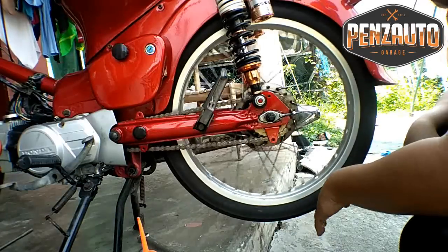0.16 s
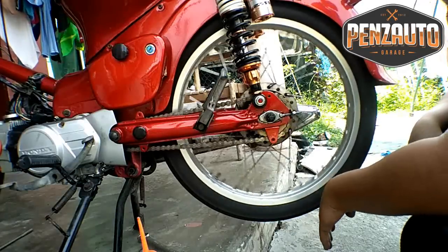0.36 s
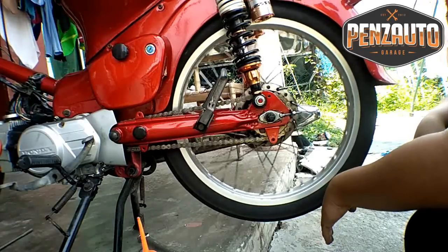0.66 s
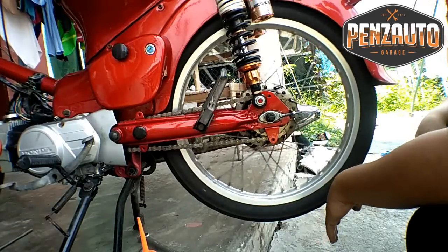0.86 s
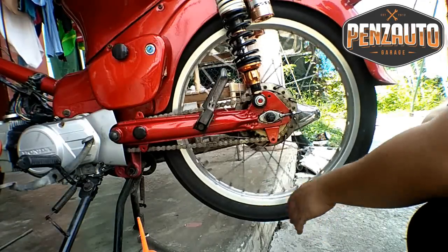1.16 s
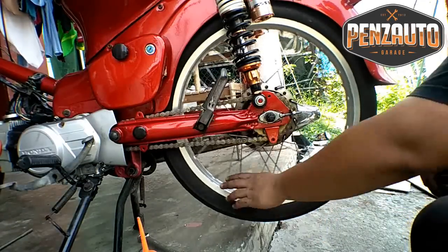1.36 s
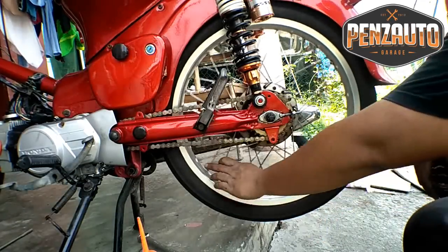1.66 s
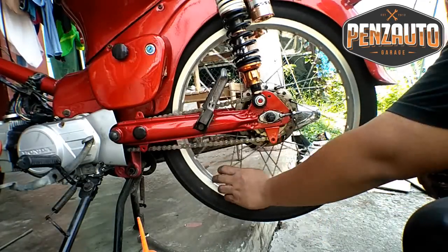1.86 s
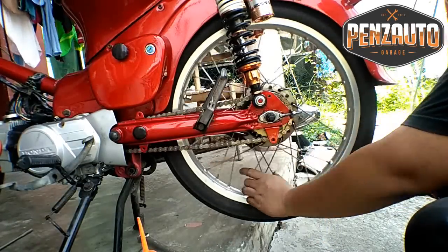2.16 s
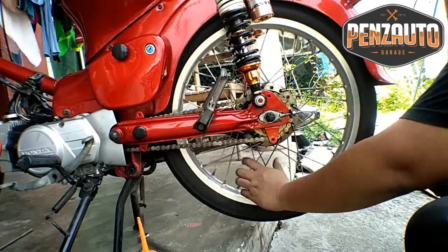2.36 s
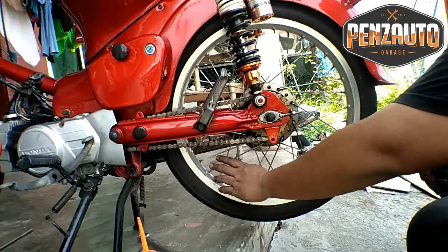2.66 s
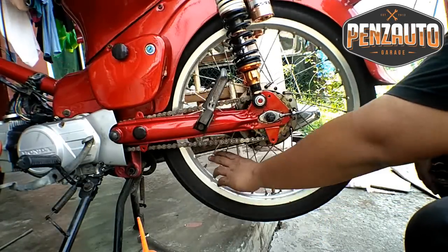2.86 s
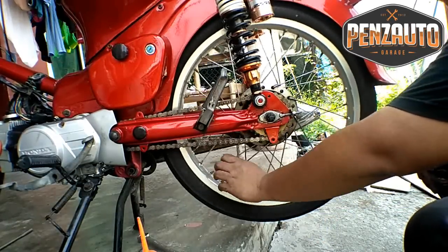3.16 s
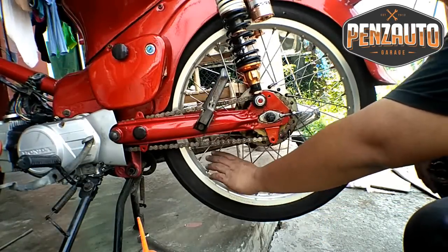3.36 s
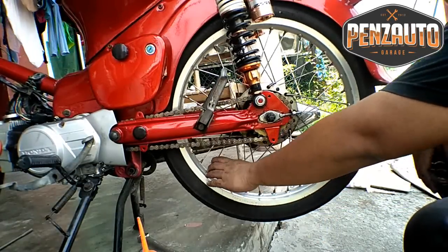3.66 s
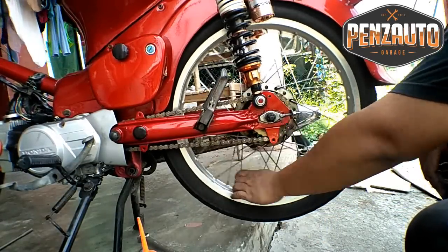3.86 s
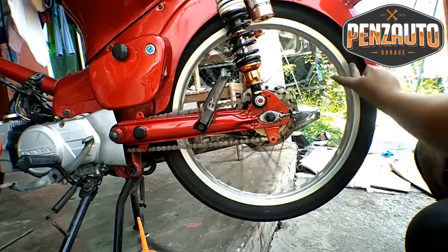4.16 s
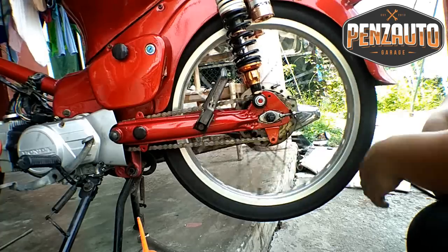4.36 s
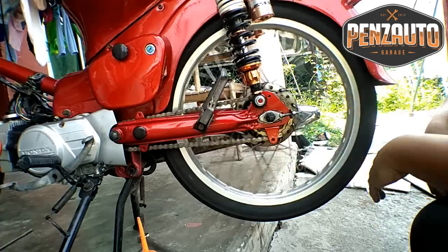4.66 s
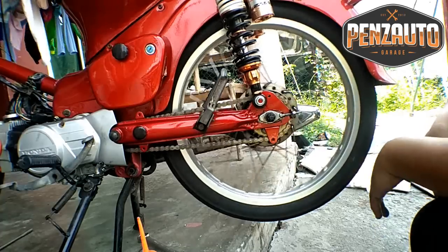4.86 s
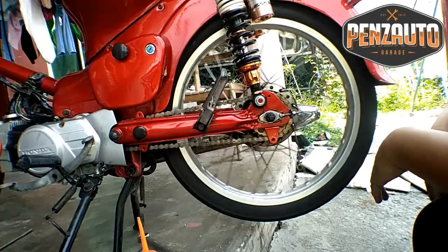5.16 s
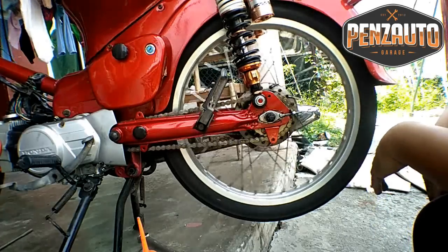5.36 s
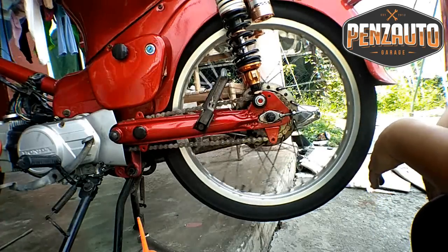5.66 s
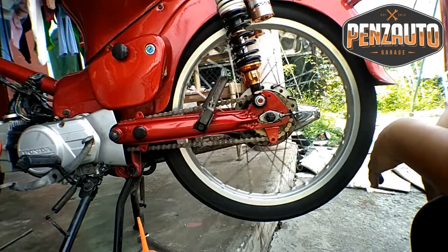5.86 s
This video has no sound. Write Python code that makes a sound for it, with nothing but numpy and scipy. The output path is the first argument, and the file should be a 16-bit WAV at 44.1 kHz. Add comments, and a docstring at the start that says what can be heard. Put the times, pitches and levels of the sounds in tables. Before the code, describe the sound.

A near stereo microphone in an open-sided garage hears a parked motorcycle's chain moved by hand, engine off. A clear clank opens at 0 s, followed by irregular soft mid-pitched clacks and small oily ticks until about 1.9 s, over a wavering low drone near 90 Hz that swells and fades, strongest around 1 to 1.5 s. A hard, bright steel snap cracks at 1.13 s, with a short garage tail; two more strike at 2.15 and 2.29 s, the first of them strongest. The chain then almost rests, with a barely audible high hiss near 3 s. From 3.1 to 3.4 s a tight cluster of dull, boomy thumps comes close on the left, the loudest at 3.22 s. From 3.9 s the clacks return, quick and dense, with crackle and a brief faint hiss around 4.2 s; the heaviest fall at 4.6 to 5.3 s, then they soften until 6 s. Faint hum and outdoor air remain beneath.

```python
"""An oiled chain clacks and ticks over its sprocket as a parked motorcycle's wheel is turned by hand, engine off.
Clacks are noise bursts plus damped chain modes; rolling adds a murmur, light touches and an oily crackle.
Three sharp steel snaps are short cracks with bright modes and a garage reverberation.
A wavering low tone swells and fades, and dull thumps, decaying sines with muffled noise, come close on the left,
mostly in one short cluster. Two brief faint hisses, a steady faint hum and outdoor air lie behind."""
import sys
import numpy as np
from scipy import signal
from scipy.fft import rfft, irfft, next_fast_len
from scipy.io import wavfile

SR = 44100
rng = np.random.default_rng(int(sys.argv[2]) if len(sys.argv) > 2 else 0)


def to_wav(sig):
    """Store sig (one row per channel, or 1-D mono) as 16-bit WAV at the path in sys.argv[1].

    Samples outside -1..1 are clipped; the rate is SR.
    """
    pcm = np.clip(np.atleast_2d(sig), -1, 1) * 32767
    pcm = np.round(pcm).astype(np.int16)
    wavfile.write(sys.argv[1], SR, pcm.T)  # frames by channels


N = 265923
TIME = np.arange(N) / SR
AGE = np.arange(SR // 3) / SR  # time since a blow [s]

# resonances of chain and swingarm: (frequency [Hz], relative level [dB], t60 [s])
CHAIN_MODES = [(590, -15, .1), (642, -15, .1), (800, -7, .16), (978, -9, .18), (1056, 0, .1),
               (1161, -.5, .1), (1250, -10, .09), (1338, -8, .1), (1472, -9, .13), (1700, -12, .11),
               (2055, -8, .11), (2140, -7, .09), (2347, -11, .1), (3290, -17, .1), (3710, -17, .1)]
# resonances of the snapping steel: (frequency [Hz], relative level [dB], t60 [s])
STEEL_MODES = [(2800, -11, .08), (3127, -4, .09), (3256, -8, .08), (3600, -8, .08), (4082, -9, .09),
               (5020, -7, .05), (5285, -1, .08), (5400, -3, .06), (5497, -2, .09), (5637, -4, .13),
               (5885, -8, .14), (6928, -13, .15), (7675, -13, .13), (8295, -2, .06), (8568, -11, .14),
               (8736, -12, .13), (9160, -12, .09), (9412, -14, .13), (9780, -14, .11), (10130, -13, .1),
               (11470, -12, .08)]
# noise spectrum of chain on sprocket: (frequency [Hz], relative level [dB])
CLACK_COLOUR = [(250, -25), (480, -14.5), (620, -2.5), (850, -4), (1150, 2), (1750, -2), (2300, -9),
                (3300, -14), (4800, -17), (7000, -11), (9000, -13.5), (11200, -6.5), (13500, -20),
                (16000, -50.5)]
# noise spectrum of parting oily links: (frequency [Hz], relative level [dB])
TICK_COLOUR = [(1000, -11.5), (2500, -8.5), (4500, -11), (6500, -7.5), (10000, -4), (14000, -6),
               (16000, -11.5)]
# stereo balance of the chain: (frequency [Hz], left minus right [dB])
CLACK_SIDE = [(600, 4.5), (800, -0.5), (1400, 1.5), (2200, -8), (4500, -5), (8000, -1.5), (11000, 14),
              (14000, -16)]
# stereo balance of the steel: (frequency [Hz], left minus right [dB])
SNAP_SIDE = [(1000, -5.5), (2600, -8.5), (5300, -6.5), (8300, -8), (11300, 7.5), (12500, -14.5)]


def from_db(db):
    """Level is logarithmic: 20 dB is a factor of ten in amplitude."""
    return 10 ** (np.asarray(db) / 20)


def rms_one(x):
    """Power normalisation: divide by the root mean square."""
    return x / np.sqrt(np.mean(x ** 2) + 1e-20)


def at_hz(points, hz):
    """Spectral interpolation on a logarithmic frequency axis."""
    table_hz, value = np.transpose(points)
    return np.interp(np.log(np.maximum(hz, 1)), np.log(table_hz), value)


def pan(side_db):
    """Constant-power panning: a level difference in dB, left minus right, at fixed mean power."""
    gains = from_db(np.array([[.5], [-.5]]) * side_db)
    return gains / np.sqrt(np.mean(gains ** 2, axis=0))


def coloured(x, colour):
    """Linear filtering: multiply the spectrum by a smooth zero-phase response."""
    length = x.shape[-1]
    size = next_fast_len(length + SR // 200)
    response = from_db(at_hz(colour, np.fft.rfftfreq(size, 1 / SR)))
    return irfft(rfft(x, size) * response, size)[..., :length]


def noise(colour, side, size):
    """Interchannel coherence: common and opposed noise mix to a set correlation, at unit overall power."""
    # (frequency [Hz], left-right correlation)
    likeness = [(60, 0.49), (250, 0.96), (1100, 0.21), (2200, 0.042), (5000, .1), (15000, 0.11)]
    padded = next_fast_len(size)
    hz = np.fft.rfftfreq(padded, 1 / SR)
    common, apart = rfft(rng.standard_normal((2, padded)))
    alike = np.clip(at_hz(likeness, hz), -1, 1)
    both = np.sqrt(1 + alike) * common + np.sqrt(1 - alike) * apart * [[1], [-1]]
    spectrum = both * pan(at_hz(side, hz)) * from_db(at_hz(colour, hz))
    return rms_one(irfft(spectrum, padded)[:, :size])


def dying(t60, rise_s):
    """Damped impact: a fast exponential rise and a decay of 60 dB per t60."""
    return from_db(-60 * AGE / t60) * (1 - np.exp(-AGE / rise_s))


def grain(depth_db, rate):
    """Amplitude fluctuation within one blow, standing for bounces and single reflections; rate in knots per s."""
    knots = rng.standard_normal(len(AGE))
    return from_db(depth_db * np.interp(AGE * rate, np.arange(len(knots)), knots))


def drift(rate):
    """Slow random modulation: normal knots of spread 1, at rate per second, joined by lines."""
    knots = rng.standard_normal(N // 100)
    return np.interp(TIME * rate, np.arange(len(knots)), knots)


def swell(start_s, held_s, db, attack_s, t60):
    """Growth and decay: a linear rise over attack_s, and a decay of t60 that sets in held_s after the start."""
    age = TIME - start_s
    decay_s = np.clip(age - held_s, 0, 3 * t60)
    return np.clip(age / attack_s, 0, 1) * from_db(db - 60 * decay_s / t60)


def mode_bank(modes):
    """Modal decomposition: each resonance is an exponentially damped complex tone."""
    hz, db, t60 = np.transpose(modes)[:, :, None]
    return from_db(db - 60 * AGE / t60) * np.exp(2j * np.pi * hz * AGE) * (1 - np.exp(-AGE / 0.001))


def ringing(bank, modes, side, scatter_db, spread):
    """Modal excitation: each strike draws new mode strengths, and phases that differ between channels [rad]."""
    hz = np.array(modes)[:, 0]
    strength, apart = rng.standard_normal((2, len(hz)))
    phase = 2 * np.pi * rng.random(len(hz)) + spread * apart * np.array([[1], [-1]])
    gains = from_db(scatter_db * strength) * pan(at_hz(side, hz))
    return np.real((gains * np.exp(1j * phase)) @ bank)


def favoured(x, hz):
    """Selective resonance: the place of contact brings out one group of modes, 86 Hz wide, by 3.5 dB."""
    peak = signal.lfilter(*signal.iirpeak(hz, hz / 86, fs=SR), x)
    return x + (from_db(3.5) - 1) * peak


def add(track, s, sound):
    """Superposition: sum a sound into the track at a time in seconds."""
    start = int(np.clip(round(s * SR), 0, N - 1))
    track[:, start:start + sound.shape[-1]] += sound[:, :N - start]


def clacks():
    """Impact of slack chain: a link slides onto a tooth and seats, its neighbour follows, the garage answers."""
    # chain on sprocket: (time [s], body weight [dB], thud weight [dB], treble weight [dB],
    # favoured resonance [Hz], left minus right [dB])
    link_strikes = [(.0004, -26.5, -39, -44.5, 1050, -3), (.1111, -40, -49, -47, 800, -6.5),
                    (.177, -41, -43, -46, 1050, -3.5), (.386, -51.5, -52, -70, 780, -2),
                    (.5043, -46, -70, -57.5, 1260, -2), (.5746, -34.5, -54, -46.5, 1110, 1.5),
                    (.7362, -37.5, -46, -83, 1180, 3), (.8081, -34.5, -43, -48, 1060, -3),
                    (.9448, -55, -61, -56, 1080, -6), (1.2875, -38.5, -46.5, -68, 770, -2),
                    (1.4396, -40.5, -92, -55.5, 1231, -5), (1.5304, -34.5, -83, -52, 1220, -4),
                    (1.7489, -40.5, -47.5, -55, 1200, -1.5), (1.8572, -43, -49.5, -65.5, 785, -1.5),
                    (2.4688, -59, -64, -69, 1130, 0), (2.8922, -53, -55.5, -68, 1036, 0),
                    (3.8802, -48.5, -63, -70, 1141, -2), (3.9789, -33, -49, -45, 1160, 4.5),
                    (4.0302, -48, -56, -62, 1300, -4), (4.1096, -53.5, -54, -56, 710, -7),
                    (4.1545, -33.5, -42.5, -36.5, 1100, -2.5), (4.2413, -43, -44.5, -55, 1090, 1.5),
                    (4.3071, -52, -45, -55, 700, -2), (4.4094, -40, -47, -51, 1020, -4.5),
                    (4.4543, -41, -51, -68, 1060, 1), (4.5545, -38, -53, -41, 1210, -5),
                    (4.6095, -29.5, -42.5, -41, 1076, 0.5), (4.7331, -49.5, -50.5, -79, 650, 6.5),
                    (4.7885, -44, -49, -72, 1087, -4.5), (4.8854, -47, -48.5, -44.5, 1087, 0.5),
                    (4.9467, -52, -50.5, -68, 1100, -5), (5.0795, -35, -50, -55.5, 1210, -5),
                    (5.134, -29, -42, -45, 1130, 0.5), (5.246, -37.5, -48, -39, 1140, -1.5),
                    (5.3102, -28, -42.5, -34.5, 1070, -3), (5.521, -49, -55, -61, 1066, -3),
                    (5.6364, -48.5, -56, -61, 560, -8), (5.7084, -46, -54, -62, 810, -8),
                    (5.765, -55, -55, -78, 830, -7), (5.8686, -41, -60, -98, 1141, -3),
                    (5.9379, -38.5, -56, -78, 1120, -1)]
    out, bank = np.zeros((2, N)), mode_bank(CHAIN_MODES)
    for s, body_db, thud_db, treble_db, ring_hz, side_db in link_strikes:
        # the clank lies between body and treble; a heavier contact also clanks more
        heaviness_db = np.clip(thud_db - body_db + 12, -10, 10)
        clank_db = body_db - 4.5 + 0.25 * (treble_db - body_db) + 0.25 * heaviness_db
        follow_s = rng.uniform(0.0079, 0.0122)
        strike = from_db(1.0) * dying(t60=0.036, rise_s=0.00018)
        second = from_db(-5.0) * np.interp(AGE - follow_s, AGE, strike, left=0)
        room = from_db(-3.5) * dying(t60=0.21, rise_s=0.0099)
        envelope = np.sqrt(strike ** 2 + second ** 2 + room ** 2) * grain(depth_db=3.0, rate=300)
        rattle = noise(CLACK_COLOUR, CLACK_SIDE, len(AGE))
        ring = from_db(-4.0) * ringing(bank, CHAIN_MODES, CLACK_SIDE, scatter_db=1.2, spread=0.54)
        # harder contacts carry more treble
        hardness = [(830, thud_db + 11.5), (1050, body_db - 0.5), (1400, body_db),
                    (2000, clank_db + 7.5), (3800, clank_db + 10.5), (6500, treble_db + 6.5)]
        clack = favoured(coloured(rattle * envelope + ring, hardness), ring_hz)
        add(out, s - .0008, clack * pan(side_db))
        # the roller rubs on the tooth just before it seats: a burst reversed in time
        burst = (rattle * dying(t60=0.034, rise_s=0.000087))[:, :SR // 80]
        rub = coloured(burst, hardness)[:, ::-1]
        add(out, s - rub.shape[1] / SR, from_db(-8) * rub)
    return out


def jingle():
    """Random excitation of resonances: loose links touch lightly and stir the chain modes."""
    out, bank = 0, mode_bank(CHAIN_MODES)
    for link in range(3):
        touches = (rng.random(N) < 14 / SR) * from_db(rng.uniform(-13, 4.4, N))  # 14 per second
        ring = from_db(-8.5) * ringing(bank, CHAIN_MODES, CLACK_SIDE, scatter_db=0.5, spread=0.41)
        tap = noise(CLACK_COLOUR, CLACK_SIDE, len(AGE)) * dying(t60=.07, rise_s=0.00047)
        touch = coloured(ring + tap, [(700, 3.0), (1100, -1.0), (3000, -4), (8000, -11.5)])
        out = out + signal.oaconvolve(touches[None], touch, axes=1)[:, :N]
    return rms_one(out)


def partings(per_s):
    """Film rupture as a random pulse train: oil parts in tiny separate ticks, each with a little room."""
    out = 0
    for link in range(4):
        clicks = (rng.random(N) < per_s / 4 / SR) * from_db(rng.uniform(-14, 0, N))
        envelope = dying(t60=.012, rise_s=.0002) + from_db(-16.5) * dying(t60=0.17, rise_s=.004)
        tick = noise(TICK_COLOUR, [(3000, -9.5), (11000, -5)], len(AGE)) * envelope
        out = out + signal.oaconvolve(clicks[None], tick, axes=1)[:, :N]
    return rms_one(out)


def rolling():
    """Rolling contact: an uneven murmur, light touches and an oily crackle, all growing with the run."""
    # how briskly the chain runs, as a reference level: (time [s], level [dB])
    run_curve = [(0.0, -55), (0.25, -59.5), (0.87, -63), (1.23, -59.5), (2.7, -65.5), (3.88, -64),
                 (4.2, -52.5), (4.43, -54), (4.94, -56), (5.21, -58.5), (5.42, -58.5), (6.03, -56.5)]
    # spectrum of rollers on teeth: (frequency [Hz], relative level [dB])
    roll_colour = [(200, -15), (600, 1), (1100, -3.5), (1700, -7), (2600, -11.5), (5000, -17.5)]
    s, level_db = np.transpose(run_curve)
    run_db = np.interp(TIME, s, level_db)
    murmur_db = run_db - 2.5 + 2 * drift(rate=46)
    murmur = noise(roll_colour, [(600, 1), (2500, -8)], N) * from_db(murmur_db)
    touches = from_db(run_db - 5.5) * jingle()
    crackle_db = -70.5 + 0.97 * (run_db - run_db.mean())  # nearly dB for dB with the run
    crackle = partings(per_s=65) * from_db(crackle_db)
    return murmur + touches + crackle


def drone():
    """Frequency modulation: a nearly pure low tone wavers as it swells with a rumble, over a faint hum."""
    # (start [s], decay onset after start [s], level if fully risen [dB], mean frequency [Hz])
    drone_swells = [(-0.04, 0.022, -42.5, 88.9), (0.219, 0.28, -45.5, 86.44), (0.79, 0.041, -47.5, 88.5),
                    (0.959, 0.46, -39, 90.4), (1.84, 0.053, -53, 91.2)]
    # faint far hum: (frequency [Hz], level [dB])
    hum_partials = [(118.4, -67), (172, -73.5), (226.1, -75)]
    swells = np.array([swell(s, held_s, db, attack_s=.06, t60=0.49) for s, held_s, db, _ in drone_swells])
    hz = np.array(drone_swells)[:, -1][swells.argmax(axis=0)]  # the strongest swell sets the pitch
    phase = 2 * np.pi * np.cumsum(hz * (1 + .022 * drift(rate=23))) / SR
    partials = np.sin(phase) + from_db(-26.5) * np.sin(2 * phase)  # weak second partial
    tone = np.sqrt(2) * partials * from_db(2.0 * drift(rate=24)) * pan(4.58)
    rumble_colour = [(25, -18.0), (55, 1.0), (165, -5.5), (260, -17), (600, -43.5)]
    rumble = from_db(-10.5) * noise(rumble_colour, [(50, 5), (300, 3.4)], N)
    hum = sum(from_db(db) * np.sin(2 * np.pi * f * TIME + 3.0 * drift(rate=7.3)) for f, db in hum_partials)
    return swells.max(axis=0) * (tone + rumble) + np.sqrt(2) * hum * pan(13)


def air():
    """Diffuse background: outdoor noise through the garage's open side, with a far murmur that grows."""
    # outdoor spectrum: (frequency [Hz], relative level [dB])
    air_colour = [(15, -33), (25, -6), (59, 1.5), (99, -2.5), (120, -11), (180, -9), (309, -19.5),
                  (641, -20.5), (775, -18.5), (1100, -18), (2050, -19.5), (2690, -22), (7510, -34),
                  (11000, -29), (16000, -57)]
    # outdoor stereo balance: (frequency [Hz], left minus right [dB])
    air_side = [(60, 6.5), (110, 0.5), (200, 8), (380, 10), (700, 1), (1290, -10.5), (2380, -6),
                (4400, -7.5), (8120, -4), (15000, 3)]
    # far murmur: (start [s], decay onset after start [s], level if fully risen [dB])
    distant_swells = [(3.6, 2.1, -56.5)]
    rest = from_db(-61.5)
    distant = rest + sum(swell(*row, attack_s=3.5, t60=2.4) for row in distant_swells)
    far_colour = [(40, -10.5), (90, 6.5), (130, 2.5), (200, 2.5), (330, -4.5), (600, -5.5), (1200, -33)]
    far = noise(far_colour, [(100, 5.6), (600, 1.2)], N)
    return from_db(-59.0) * noise(air_colour, air_side, N) + far * distant * from_db(2.6 * drift(rate=13))


def ticks():
    """Stick-slip release: sticky links let go with a tiny bright tick."""
    # oily links: (time [s], main weight [dB], top-end weight [dB])
    link_releases = [(0.042, -48, -36), (0.172, -36, -47), (0.361, -45, -48), (0.821, -46, -37),
                     (0.8642, -46, -62), (1.606, -53, -42.5), (1.7294, -31.5, -37.5), (1.9596, -46.5, -59),
                     (2.1165, -33.5, -32.5), (3.2132, -57.5, -51), (3.7923, -50.5, -48), (4.0422, -38, -68),
                     (4.1023, -46, -58), (4.132, -44, -53), (4.1752, -31.5, -38.5), (4.216, -35, -39.5),
                     (4.344, -34, -43), (4.355, -37.5, -39), (4.382, -37.5, -40), (4.416, -58, -43),
                     (4.4374, -49, -59), (4.8868, -30, -41), (4.9064, -45, -39.5), (5.3854, -43, -48),
                     (5.491, -67, -49), (5.683, -54, -58)]
    out, bank = np.zeros((2, N)), mode_bank(STEEL_MODES)
    for s, db, top_db in link_releases:
        envelope = dying(t60=0.024, rise_s=0.00037) + from_db(-13.0) * dying(t60=0.29, rise_s=0.0044)
        envelope = envelope * grain(depth_db=2.0, rate=1300)
        tick = noise(TICK_COLOUR, [(3000, -7.0), (11000, -7.5)], len(AGE)) * envelope
        ring = from_db(-23.5) * ringing(bank, STEEL_MODES, SNAP_SIDE, scatter_db=5.5, spread=0.98)
        add(out, s, coloured(tick + ring, [(8000, db - 2.5), (12500, top_db + 5.5)]))
    return out


def snaps():
    """Hard impact: steel slips and hits steel with a brief scrape, a crack, a short ring, then the room."""
    # (time [s], ring weight [dB], low ring weight [dB], top weight [dB],
    # first contact gain [dB], room gain [dB], room t60 [s])
    steel_hits = [(1.1287, -15.5, -18, -14.5, 2.5, -12.5, 0.29), (2.1524, -11.5, -18, -7, 3, -13, 0.24),
                  (2.288, -14.5, -21.5, -13, -7, -14, 0.25)]
    # crack spectrum: (frequency [Hz], relative level [dB])
    snap_colour = [(600, -48), (1400, -25), (2400, -13.5), (3100, -3.5), (3950, -2), (4300, -3.5),
                   (4680, -12), (5300, 9), (6500, -3.5), (8400, -1), (10600, -8.5), (11500, -5),
                   (13000, -11.5), (15300, -14.5), (16200, -36.5)]
    room_colour = [(1800, 11), (3000, 0), (4600, -4), (5300, -1.0), (7000, 2.5), (11000, 5.5)]
    out, bank = np.zeros((2, N)), mode_bank(STEEL_MODES)
    for s, db, low_db, top_db, crack_db, room_db, room_t60 in steel_hits:
        weight = [(1500, low_db - 0.5), (2800, low_db + 4.5), (4300, low_db - .5),
                  (5100, db - 4.5), (6500, db - 6.5), (8200, top_db - 4.0)]
        # a first instant of contact, then the clatter
        contact = from_db(crack_db) * dying(t60=0.0039, rise_s=0.00037)
        clatter = from_db(1.5) * dying(t60=0.063, rise_s=0.000628)
        envelope = (contact + clatter) * grain(depth_db=1.0, rate=1800)
        crack = noise(snap_colour, SNAP_SIDE, len(AGE)) * envelope
        ring = from_db(-12) * ringing(bank, STEEL_MODES, SNAP_SIDE, scatter_db=1.0, spread=0.25)
        room = noise(snap_colour, [(2500, -7), (9000, -0.5)], len(AGE)) * dying(t60=room_t60, rise_s=.006)
        room = coloured(room * grain(depth_db=0.5, rate=400), room_colour)
        add(out, s, coloured(crack + ring + from_db(room_db) * room, weight))
        # the scrape before it is the crack's onset reversed in time
        scrape = coloured(crack, weight)[:, :SR // 100][:, ::-1]
        add(out, s - scrape.shape[1] / SR, from_db(-30) * scrape)
    return out


def thumps():
    """Damped oscillation: soft blows near the left microphone, each a boom and a muffled puff, with a rumble."""
    # (time [s], boom gain [dB], boom frequency [Hz], puff gain [dB])
    soft_blows = [(2.127, -31, 103, -51), (3.095, -22, 72, -52.5), (3.170, -14.5, 99, -23.5),
                  (3.201, -14.5, 105, -56), (3.221, -8, 108.6, -19.5), (3.247, -12, 83, -25.5),
                  (3.262, -23, 75, -20.5), (3.314, -21, 141, -21.5), (3.345, -22.5, 61.7, -54),
                  (3.394, -22, 188.4, -43), (3.411, -19.5, 66, -26.5), (3.567, -31.5, 61.8, -60),
                  (4.356, -35.5, 54, -49), (4.458, -35.5, 52, -63)]
    # puff spectrum: (frequency [Hz], relative level [dB])
    puff_colour = [(25, -11.5), (60, 0), (170, 13), (340, -3), (500, -18.5), (700, -41), (1200, -59.5)]
    attack_s = 0.065
    # each thump stirs a rumble 19.5 dB below its boom gain, fully risen at the blow
    stirred = np.max([swell(s - attack_s, attack_s, boom_db - 19.5, attack_s, t60=.6)
                      for s, boom_db, _, _ in soft_blows], axis=0)
    rumble_colour = [(25, -17.5), (48, 8.0), (90, 1.5), (180, -11.0), (350, -31.5), (700, -73.5)]
    out = stirred * noise(rumble_colour, [(50, 11), (200, 19.0)], N)
    near_left = pan(17)
    for s, boom_db, hz, puff_db in soft_blows:
        boom = np.sin(2 * np.pi * hz * AGE) * dying(t60=.068, rise_s=0.0056) * near_left
        puff = noise(puff_colour, [(60, 14), (220, 28)], len(AGE)) * dying(t60=0.05, rise_s=0.0017)
        add(out, s, from_db(boom_db) * boom + from_db(puff_db) * puff)
    return out


def sizzle():
    """Band-limited noise: faint, narrow, high hisses while the wheel is eased round."""
    # (start [s], decay onset after start [s], level if fully risen [dB], band frequency [Hz])
    hiss_swells = [(2.75, 0.48, -68.5, 12500), (4.15, 0.14, -55.5, 7100)]
    out = 0
    for s, held_s, db, hz in hiss_swells:
        band = [(0.74 * hz, -25), (0.83 * hz, -10), (hz, -2), (1.3 * hz, -10), (1.1 * hz, -28)]
        hiss = noise(band, [(7000, -2.7), (14000, -0.31)], N)
        out = out + swell(s, held_s, db, attack_s=0.14, t60=0.24) * hiss
    return out


def at_microphones(x):
    """Interchannel delay: the wheel's sound reaches the left microphone first."""
    lag = 5  # samples, about 0.11 ms
    return np.array([x[0], np.pad(x[1], (lag, 0))[:N]])


def scene():
    """Superposition of all that sounds around the wheel."""
    wheel = at_microphones(clacks() + ticks() + rolling())
    return wheel + snaps() + sizzle() + drone() + thumps() + air()


def record(dry):
    """Band limiting: the deepest bass rolls off below 32 Hz and the top is cut steeply at 15.9 kHz."""
    thinned = signal.sosfilt(signal.butter(2, 32, "high", fs=SR, output="sos"), dry)
    return signal.sosfilt(signal.ellip(10, .1, 80, 15900, fs=SR, output="sos"), thinned)


dry = scene()
out = record(dry)
to_wav(out)
```